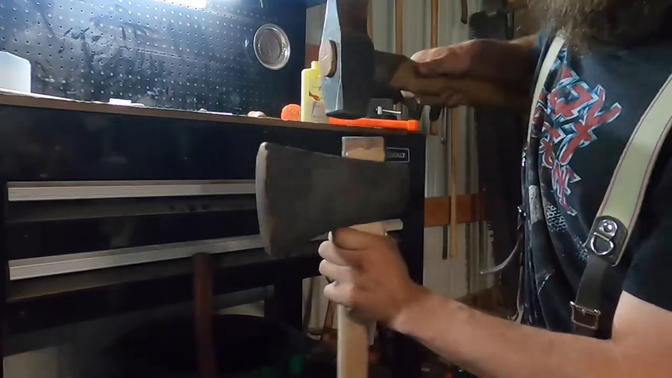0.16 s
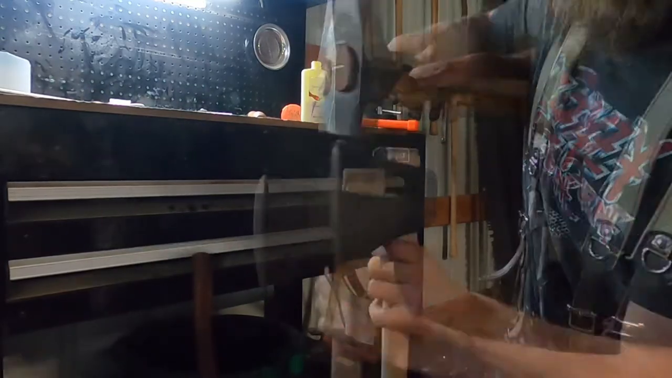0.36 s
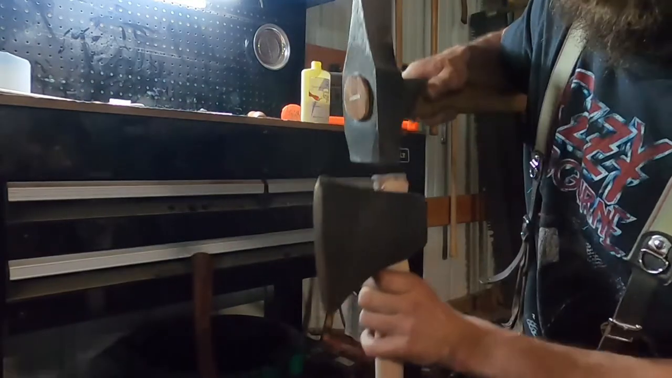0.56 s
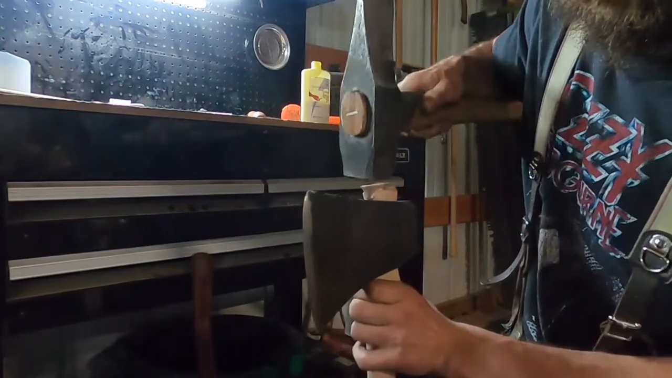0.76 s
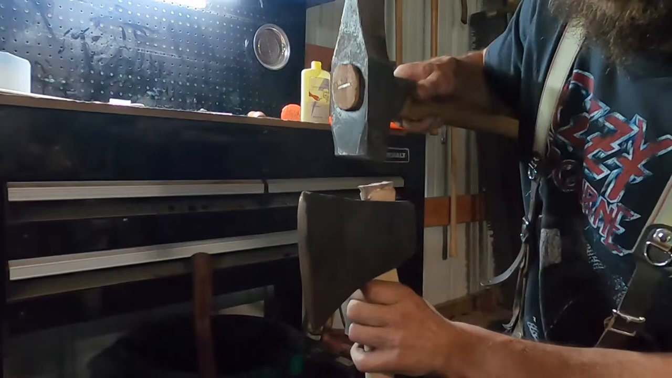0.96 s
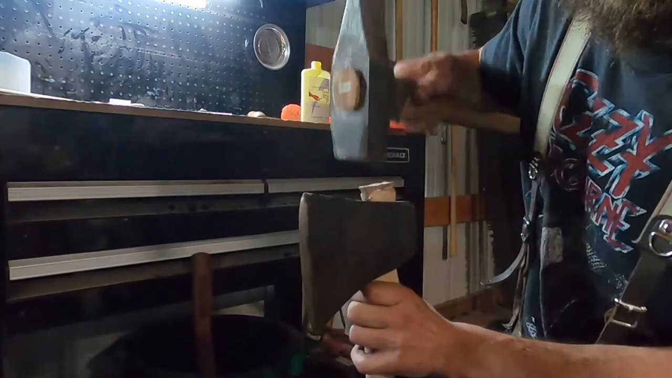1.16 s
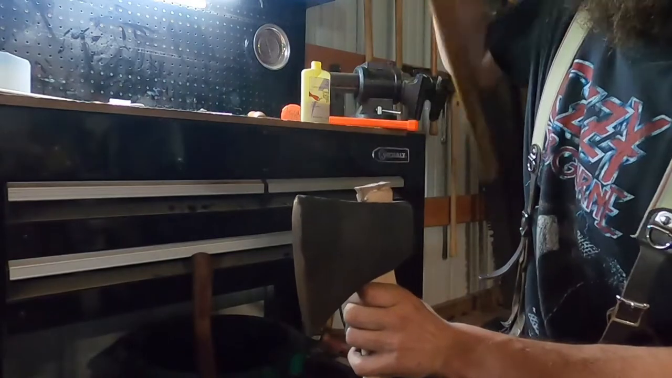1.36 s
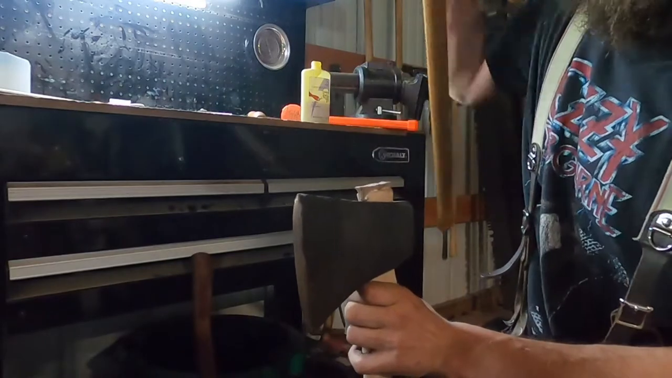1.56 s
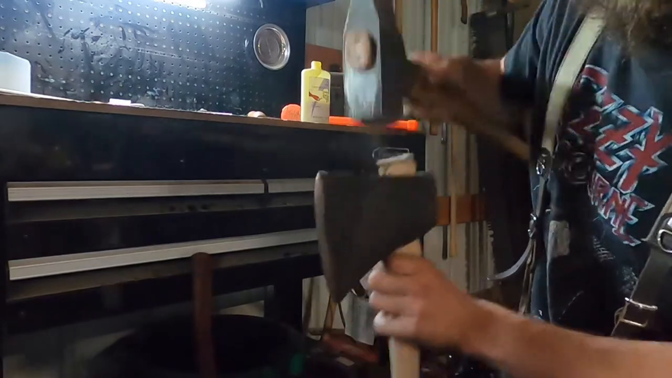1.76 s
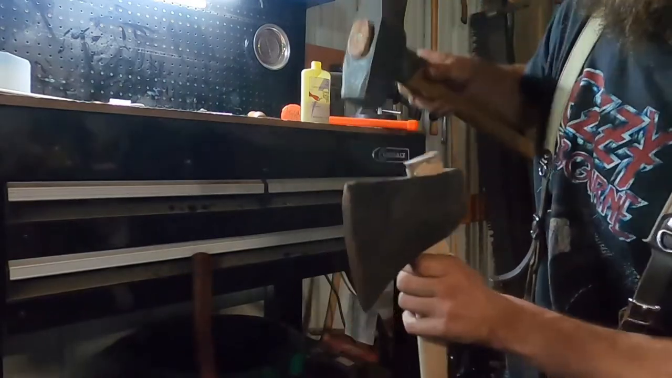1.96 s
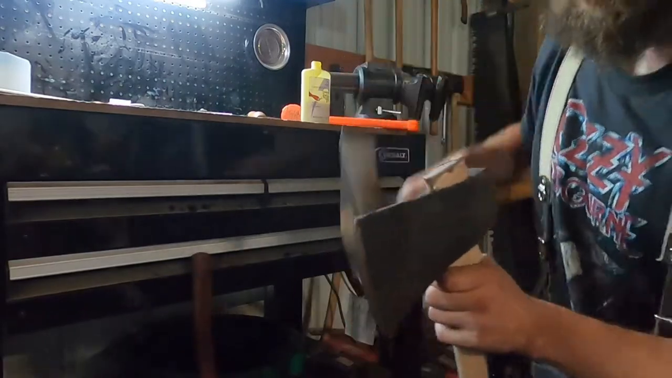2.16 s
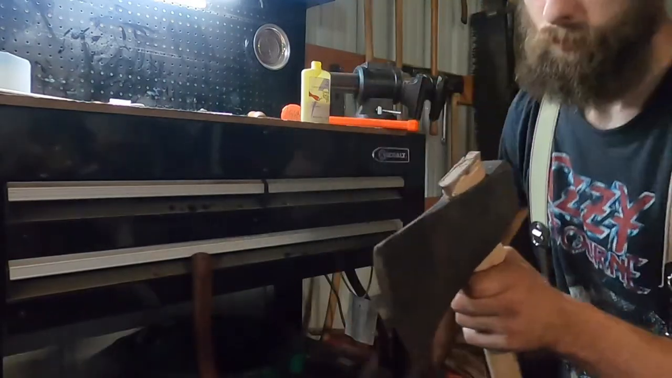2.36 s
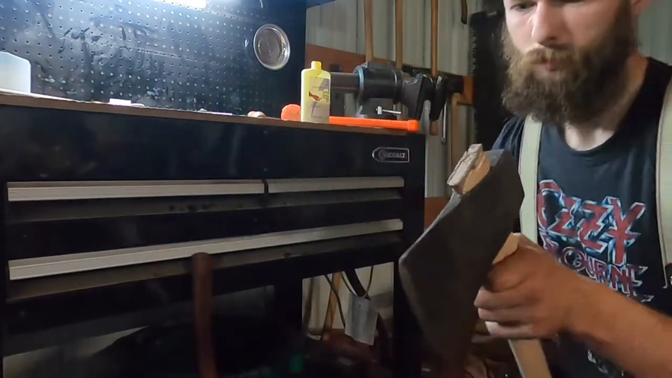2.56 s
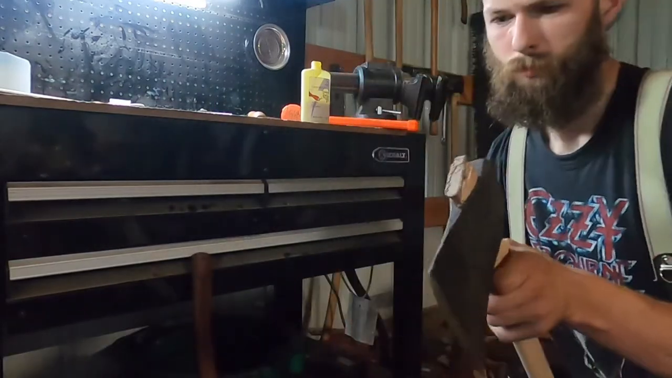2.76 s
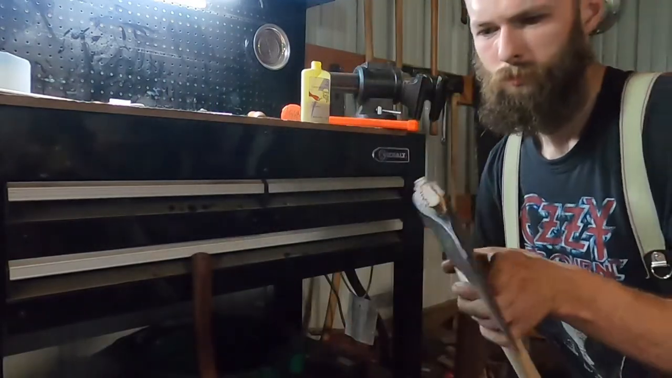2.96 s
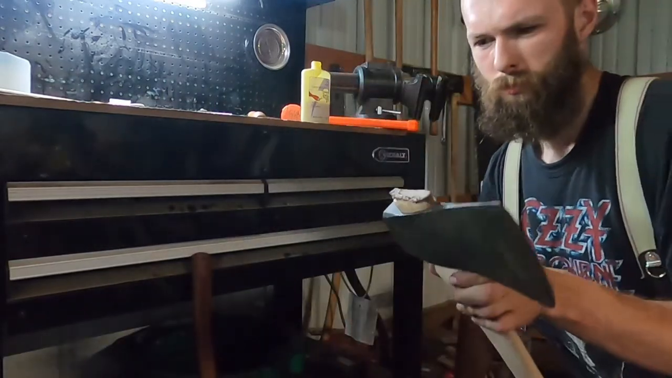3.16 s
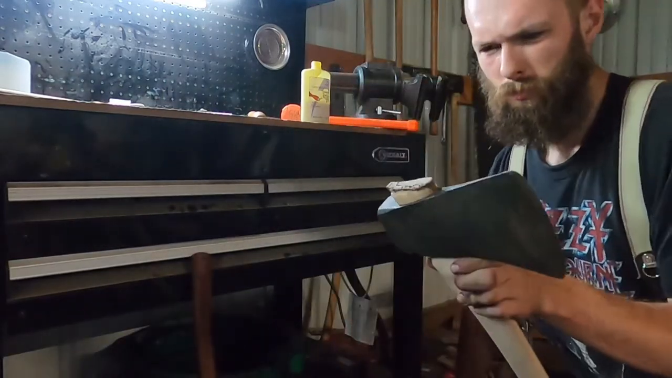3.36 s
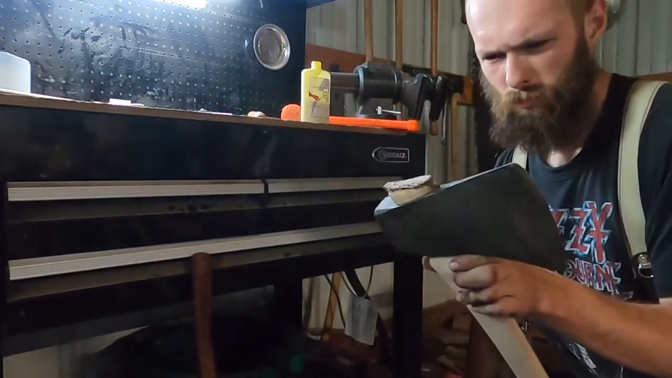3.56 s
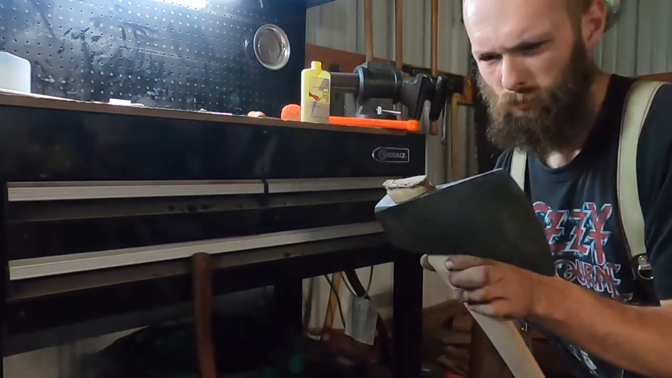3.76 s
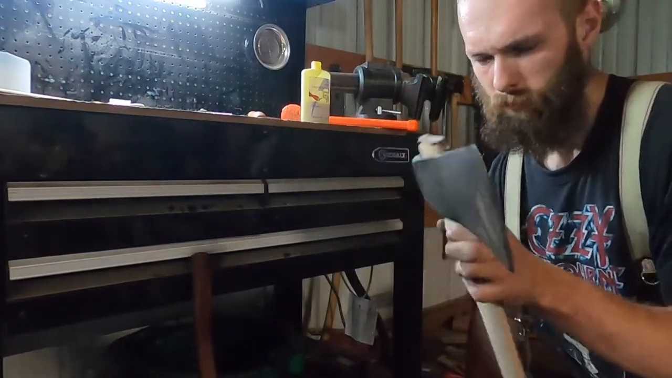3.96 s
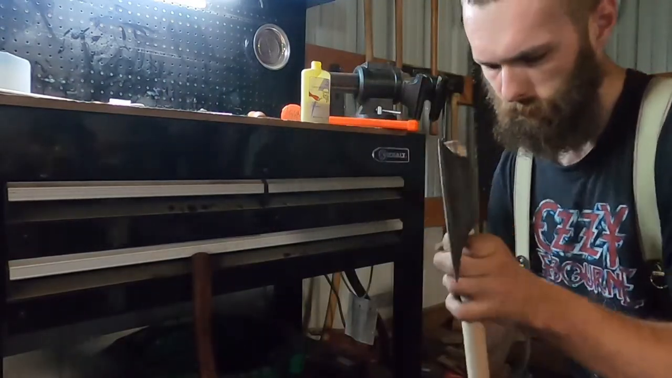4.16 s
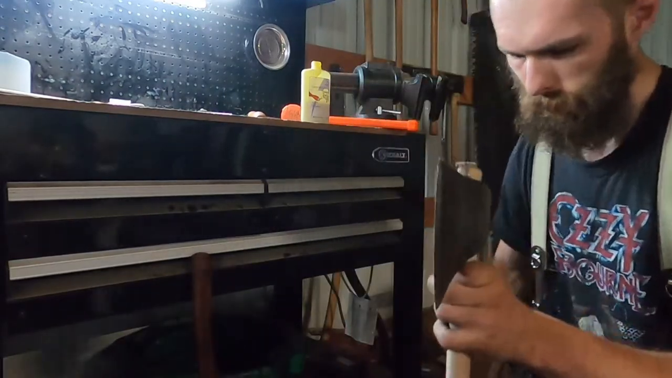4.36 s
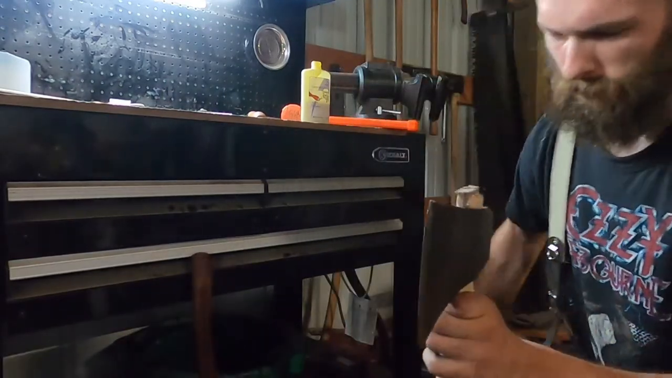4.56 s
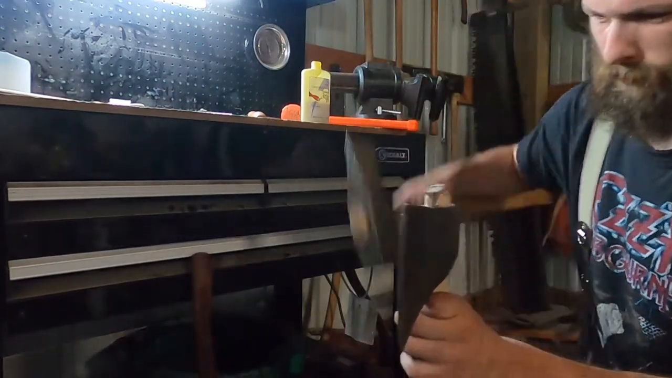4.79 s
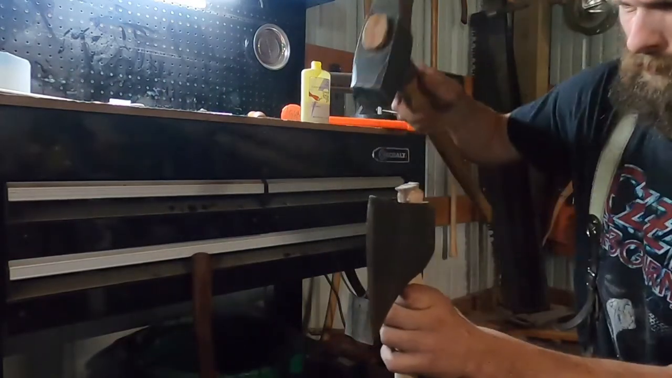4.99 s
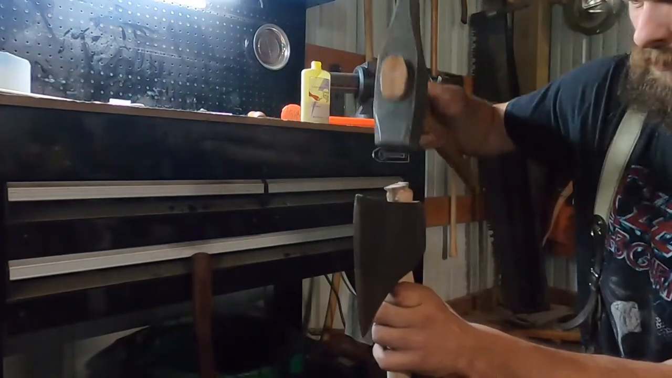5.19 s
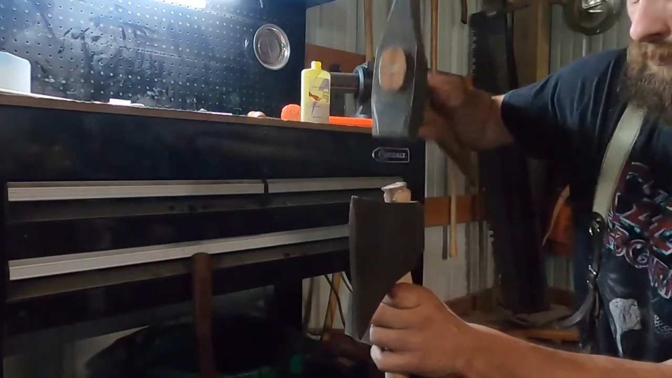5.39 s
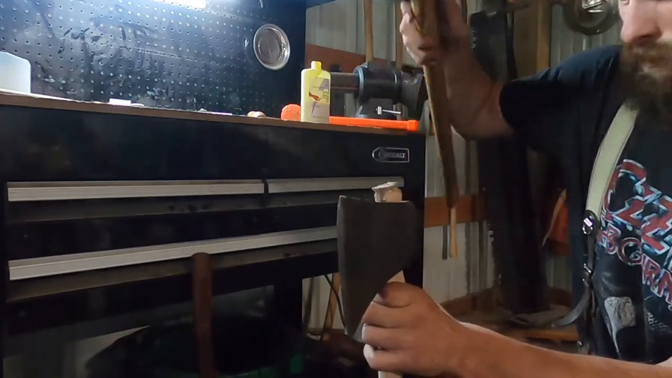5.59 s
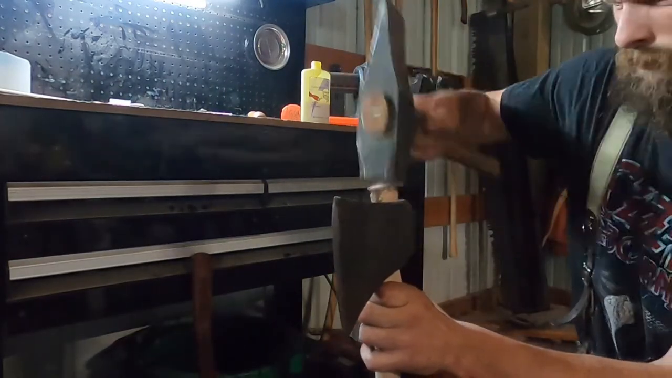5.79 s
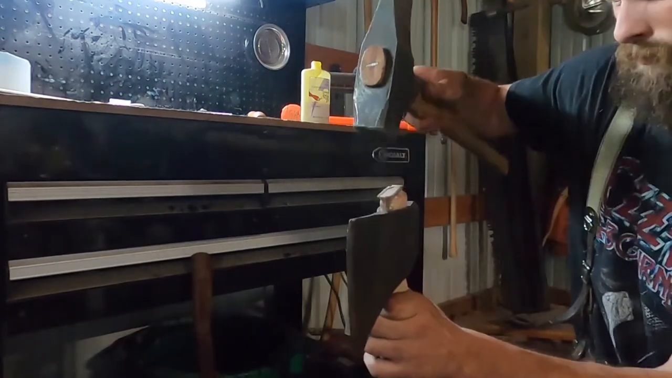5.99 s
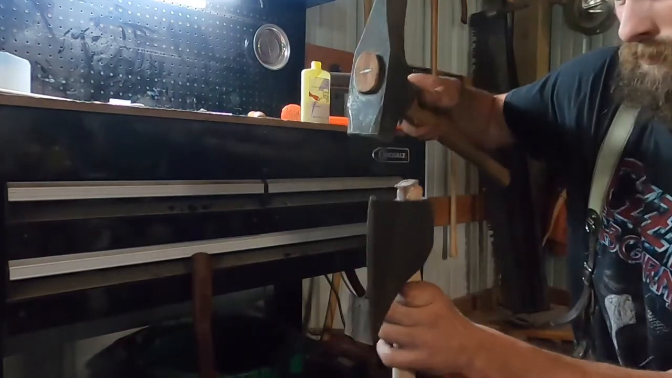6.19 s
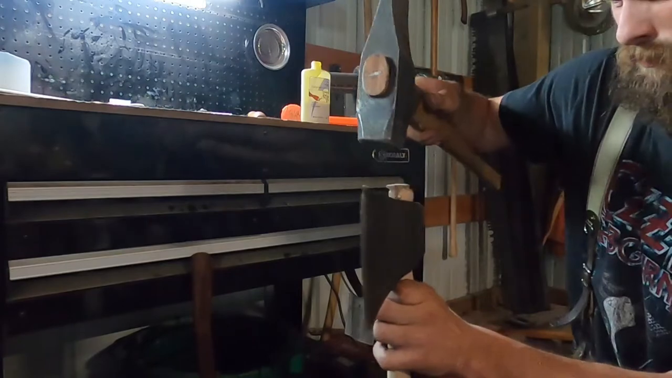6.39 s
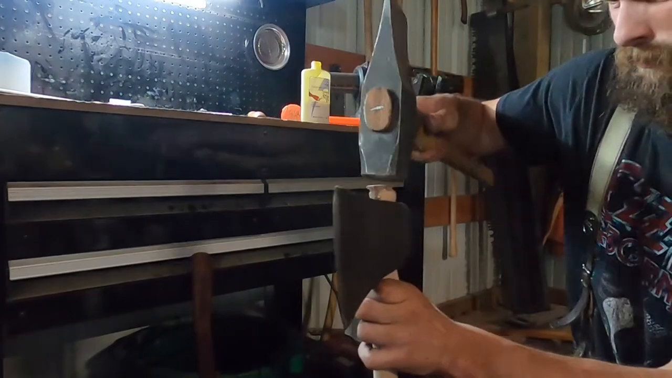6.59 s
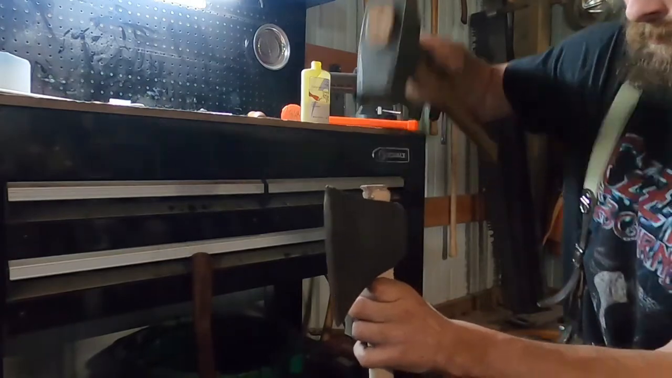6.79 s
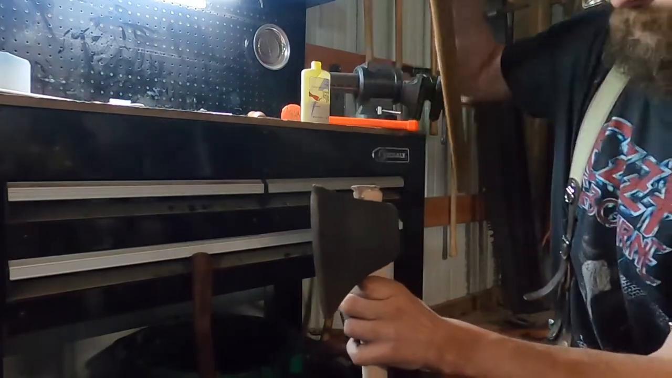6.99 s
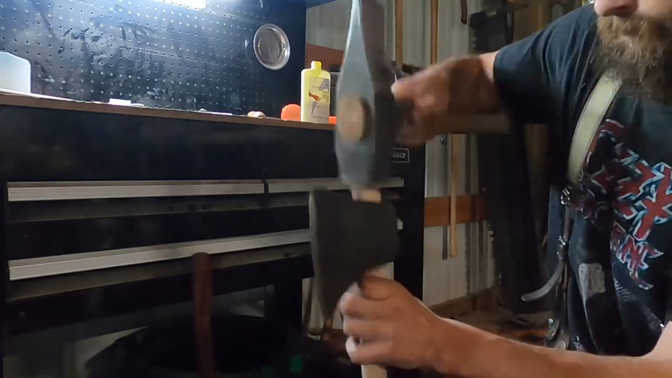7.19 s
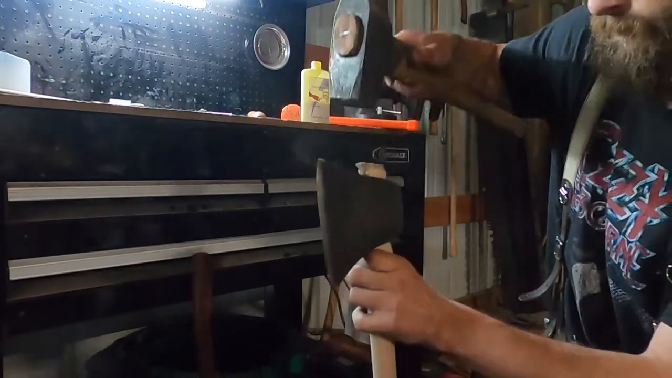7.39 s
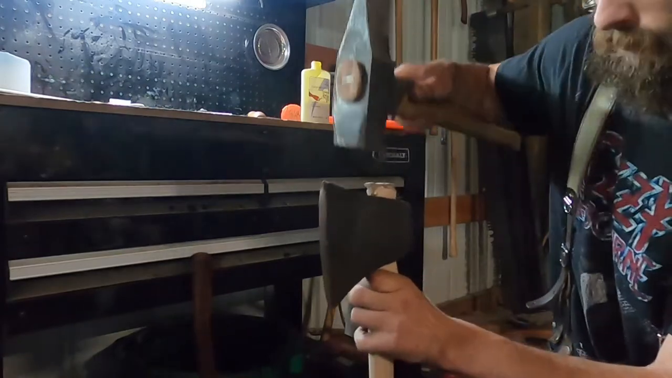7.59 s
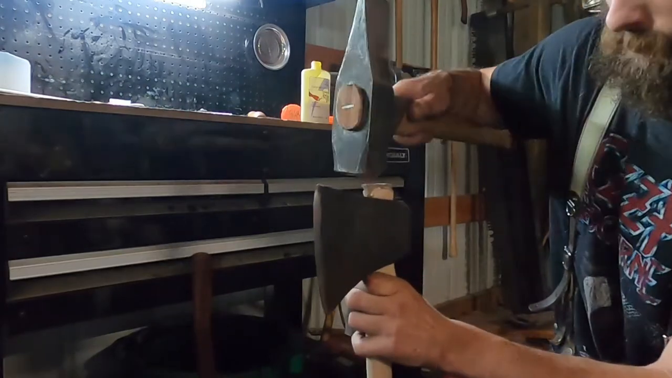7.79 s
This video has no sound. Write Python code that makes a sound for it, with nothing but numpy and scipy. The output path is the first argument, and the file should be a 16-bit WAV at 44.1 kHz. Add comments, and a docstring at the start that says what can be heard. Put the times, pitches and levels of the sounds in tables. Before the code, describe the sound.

Close up in a workshop, a hammer hits a wedge in an axe handle: one very hard blow, a quick tap, then another strike. Each knocks woodenly, the axe head ringing briefly and the room echoing for about a second. The handle bumps the floor and scuffs softly while a low machine hum slowly swells. Hammering resumes with two aiming taps and two strong, widely spaced blows, ending in light taps.

```python
"""Wedging an axe handle

A workshop, stereo microphone close to an axe that stands on the floor, a little to the right.
A hammer drives a wooden wedge into the handle: each blow cracks, rings the axe, knocks through the
handle and thuds into the floor; the room and a steel tool cabinet ring on. Between blows come bumps,
faint scuffs and hisses over a low hum. A limiter holds hard blows down, so their echo swells."""
import sys
import numpy as np
from scipy import signal
from scipy.fft import rfft, irfft
from scipy.io import wavfile
from scipy.ndimage import uniform_filter1d, minimum_filter1d

SR = 44100
rng = np.random.default_rng(int(sys.argv[2]) if len(sys.argv) > 2 else 0)


def output_pcm(signal):
    """Save a mono or channel-first signal as 16-bit PCM at the path in sys.argv[1].

    Samples are clipped to [-1, 1] before scaling.
    """
    pcm = np.clip(np.atleast_2d(signal).T, -1, 1) * 32767
    wavfile.write(sys.argv[1], SR, np.round(pcm).astype(np.int16))


N = 345744

# stereo width of the room at the microphone: (frequency [Hz], side relative to mid [dB])
SIDE_SPECTRUM = [(60, -20), (250, -17), (600, -8), (1500, -5.5), (4000, -3.5), (10000, -9)]


def from_db(db):
    """Gain of a level in dB."""
    return 10 ** (np.asarray(db) / 20)


def unit(x):
    """Scales to an rms of 1."""
    return x / np.sqrt(np.mean(x ** 2) + 1e-20)


def read(points, hz):
    """Reads a table on a log-frequency axis."""
    point_hz, values = np.transpose(points)
    return np.interp(np.log(hz + 1), np.log(point_hz + 1), values)


def add(mix, start_s, sound):
    """Mixes a sound in at its start time."""
    part = mix[..., round(start_s * SR):][..., :sound.shape[-1]]
    part += sound[..., :part.shape[-1]]


def colour(x, points):
    """Filters by a spectrum of (frequency [Hz], gain [dB]) points."""
    size = x.shape[-1]
    return irfft(rfft(x) * from_db(read(points, np.fft.rfftfreq(size, 1 / SR))), size)


def causal(gain_db):
    """The promptest impulse response with this spectral shape, at energy 1."""
    log_gain = np.log(from_db(np.r_[gain_db, gain_db[-2:0:-1]]))
    response = np.fft.ifft(np.exp(np.conj(signal.hilbert(log_gain)))).real
    return response / np.linalg.norm(response)


def ring(modes, t):
    """Dying sines of a struck object."""
    return sum(from_db(db - 60 * t / t60) * np.sin(2 * np.pi * hz * t) for hz, db, t60 in modes)


def drift(rate_hz):
    """Slow random wander with an rms of 1."""
    hz = np.fft.rfftfreq(N, 1 / SR)
    return unit(irfft(rfft(rng.standard_normal(N)) * np.exp(-(hz / rate_hz) ** 2), N))


def room_air(level_db=-45, swell_db=2.0):
    """Room tone around the microphone: a wavering rumble with a faint hiss near 5500 Hz."""
    # spectrum of the air: (frequency [Hz], relative density [dB])
    spectrum = [(12, -35), (25, -19), (42, -7), (70, 0), (100, -5), (125, -15), (205, -15), (270, -31),
                (600, -42), (1100, -36.5), (1800, -47), (4000, -55.5), (4900, -55), (5500, -47),
                (6100, -63), (13000, -85)]
    noise = unit(colour(rng.standard_normal((2, N)), spectrum))
    mid, side = from_db(level_db + swell_db * drift(4.0)) * noise
    side = colour(side, SIDE_SPECTRUM)
    return np.array([mid + side, mid - side])


def machine_hum(peak_s=5.2, peak_db=-37, rest_db=-56, rise_db_per_s=6.5, fall_db_per_s=8.5):
    """A machine's low hum, centred: it wanders in pitch, grows steadily, then sinks back."""
    # lines of the hum: (frequency [Hz], relative level [dB])
    lines = [(75.4, 13), (91, -17), (181.5, -22.5), (196, -15)]
    t, hum = np.arange(N) / SR, np.zeros(N)
    for hz, db in lines:
        wandering_hz = hz + 0.556 * drift(5.0)
        hum += from_db(db) * np.sin(2 * np.pi * np.cumsum(wandering_hz) / SR)
    rising_db = peak_db - rise_db_per_s * (peak_s - t)
    falling_db = np.maximum(peak_db - fall_db_per_s * (t - peak_s), rest_db)
    return from_db(np.where(t < peak_s, rising_db, falling_db)) * unit(hum)


def wood_slip(tilt_db_per_octave):
    """One slip of the wedge; a sharper contact is brighter."""
    # the dry crack of steel on wood: (frequency [Hz], relative level [dB])
    spectrum = [(40, -18.5), (200, 0.5), (450, 0.5), (950, 3.5), (1400, -2.5), (2000, -4), (2900, -7.5),
                (3900, -16), (5200, -21), (7000, -32), (9000, -34), (11000, -54.5), (15000, -59)]
    hz = np.fft.rfftfreq(2048, 1 / SR)
    return causal(read(spectrum, hz) + tilt_db_per_octave * np.log2(np.maximum(hz, 700) / 1500))


def crushing(t, touch=0.24, crush_s=0.0062, fade_s=0.0016, chatter=0.16, chatter_s=0.034):
    """Strength of the slips: it grows as the wedge is driven, then drops to a chatter of the head."""
    rise = np.interp(t, [0, crush_s], [touch, 1])
    after = np.maximum(t - crush_s, 0)
    return rise * (np.exp(-after / fade_s) + chatter * np.exp(-after / chatter_s))


def axe_ring(t, centre_hz, reach_octaves):
    """Where and how the axe is hit decides which partials sound."""
    # the axe's modes up to about 7 kHz, then a brief high sizzle at 11-12 kHz:
    # (frequency [Hz], relative level [dB], t60 [s])
    partials = [(691, -12.5, 0.28), (777, -5.5, 0.06), (910, -12.5, 0.15), (966, -10.5, 0.19),
                (1140, -2, 0.035), (1170, -0.5, 0.035), (1295, -11.5, 0.05), (1743, -9, 0.12),
                (1955, -5, 0.11), (2053, -6.5, 0.085), (2270, -14, 0.036), (2530, -3.5, 0.08),
                (2600, -5, 0.088), (2845, -4.5, .1), (3340, -7, 0.14), (5000, -5, .06), (5070, -8, .05),
                (5333, -5, 0.057), (6640, -8.5, 0.06), (6770, -7, 0.06), (6890, -9.5, 0.036),
                (7030, -6, 0.047), (11050, -12, 0.012), (11700, -11, .012), (12200, -11, 0.012)]
    woken = [(hz, db - min(9 * (np.log2(hz / centre_hz) / reach_octaves) ** 2, 70), t60)
             for hz, db, t60 in partials]
    return ring(woken, t) * (1 - np.exp(-t * centre_hz))  # they build up over about one swing


def handle_knock(t, hz, peak_s=0.00434, rebound_s=0.003, rebound_width_s=0.00042):
    """The handle is squeezed, springs back and rebounds; a harder knock is higher and swings more."""
    cycles = (t - peak_s) * hz
    swings = (hz / 400) ** 0.37
    width_cycles = swings * np.where(cycles < 0, 0.74, 0.29)  # slow rise, quick fall
    squeeze = -np.cos(2 * np.pi * cycles) * np.exp(-(cycles / width_cycles) ** 2)
    rebound = 0.08 / swings * np.exp(-((t - peak_s - rebound_s) / rebound_width_s) ** 2)
    return squeeze + rebound


def floor_thud(t, delay_s=0.008, floor_hz=84, decay_s=0.0053, radiate_hz=56):
    """The butt of the handle pushes the floor, which answers late and low."""
    late = np.maximum(t - delay_s, 0)
    swing = np.sin(2 * np.pi * floor_hz * late) * np.exp(-late / decay_s)
    radiation = signal.butter(2, radiate_hz, "high", fs=SR)  # slow motion moves little air
    return signal.lfilter(*radiation, swing)


def contact(knock_hz, crack_db, tilt, thud_db, ring_db, ring_hz, reach, room_db):
    """One hit on the axe, as four rows: the direct sound, then three paths into the room."""
    t = np.arange(SR // 3) / SR
    strength = crushing(t)
    slip = from_db(crack_db) * wood_slip(tilt)
    crack = signal.fftconvolve(rng.choice([-1., 1.], len(t)) * strength, slip)[:len(t)]
    axe = handle_knock(t, knock_hz) + from_db(ring_db) * axe_ring(t, ring_hz, reach)
    floor = from_db(thud_db) * floor_thud(t)
    # the slips radiate every way: half their energy blends evenly, half keeps the crack's own colour
    blended = np.linalg.norm(strength) * np.pad(slip, (0, len(t) - len(slip)))
    sends = np.array([np.sqrt(0.5) * blended,
                      from_db(-2.5) * axe,
                      from_db(9.0) * floor + np.sqrt(0.5) * crack])
    return np.vstack([crack + axe + floor, from_db(room_db) * sends])


def hammer_blows(full_swing_hz=880, full_crack_db=-3, crack_db_per_octave=16):
    """A light tap on the wedge mostly knocks; a hard swing knocks higher and crushes the wood."""
    # aiming taps and full swings; ring and thud are relative to the force:
    # (time [s], force [dB], knock [Hz], ring [dB], ring centre [Hz], ring reach [octaves],
    #  treble tilt of the crack [dB/octave], floor thud [dB], room send [dB])
    blows = [ (0.0754, 19, 875, -26.5, 5000, 0.41, -3, 0, -8),
             (0.3064, -12, 1530, -16, 4760, 0.33, -2.5, 13, -11),
             (1.7705, 0, 778, -0.5, 860, .33, -0.5, -2.5, -2.5),
             (4.593, -10, 409, -12.5, 1437, 0.5, 0.5, -21.5, -1.5),
             (5.3654, -9.5, 361, -14.5, 675, 0.32, -2, -15, -2.5),
             (5.8875, 1.5, 572, -26, 8650, 0.53, -2.5, -5.5, -2.5),
             (7.2947, 0, 893, -9.5, 1280, 0.68, -4, -2.5, -5),
             (7.6177, -20, 335, -40, 1520, .4, -1, -17, -5),
             (7.7988, -12, 412, -24.5, 1497, 0.36, -5.5, -19, -9.5)]
    paths = np.zeros((4, N))
    for start_s, force_db, knock_hz, ring_db, ring_hz, reach, tilt, thud_db, room_db in blows:
        crack_db = full_crack_db + crack_db_per_octave * np.log2(knock_hz / full_swing_hz)
        blow = contact(knock_hz, crack_db, tilt, thud_db, ring_db, ring_hz, reach, room_db)
        add(paths, start_s, from_db(force_db) * blow)
    return paths


def workshop_echo(send, first_s=0.0039, build_s=0.0054):
    """A dense echo builds as the walls answer, over standing waves and the ringing steel cabinet."""
    # colour of the echo: (frequency [Hz], relative level [dB])
    spectrum = [(30, -5), (60, 6.5), (110, 12), (175, 11.5), (260, 6), (380, -1.77), (600, 1), (900, 1.5),
                (1500, 0.5), (3000, -0.5), (6000, -1), (14000, 4)]
    # decay of the echo: (frequency [Hz], t60 [s])
    decay = [(60, 0.0159), (160, 0.3821), (400, 1), (1000, 0.82), (2500, 1.0), (5000, 1.0), (8000, 0.89),
             (12000, 0.48), (14000, 0.21)]
    # standing waves of the room: (frequency [Hz], level [dB], t60 [s])
    standing_waves = [(53.9, -61, 0.93), (87.54, -56, 0.48), (125.7, -59.5, .7), (151, -55, 0.85),
                      (182.8, -53, 0.57)]
    # the tool cabinet, ringing in sympathy: (frequency [Hz], level [dB], t60 [s])
    cabinet_modes = [(684, -62, 0.97), (786, -59, 0.35), (910, -61.5, 0.73), (1563, -63.5, 0.56),
                     (1705, -62, 1), (1961, -67.5, 0.7), (2870, -65.5, 0.8)]
    t = np.arange(SR * 3 // 2) / SR
    mid, side = colour(rng.choice([-1., 1.], (2, len(t))), spectrum)
    hz, times, bands = signal.stft(np.array([mid, colour(side, SIDE_SPECTRUM)]), SR, nperseg=512)
    bands *= from_db(-60 * times / read(decay, hz)[:, None])
    tails = signal.istft(bands, SR, nperseg=512)[1][:, :len(t)]
    tails *= np.clip((t - first_s) / build_s, 0, 1)
    tails /= np.linalg.norm(tails[0])
    tails[0] += ring(standing_waves + cabinet_modes, t)
    mid, side = signal.fftconvolve(send[None], tails, axes=1)[:, :N]
    return np.array([mid + side, mid - side])


def floor_bumps(thud_db=-5.5, tilt=1):
    """The butt meets the floor as the axe is shifted: a thin click, a low knock, a ring and a thud."""
    # bumps; click and ring are relative to the force: (time [s], force [dB], knock [Hz], click [dB],
    #  ring [dB], ring centre [Hz], ring reach [octaves], room send [dB])
    bumps = [ (0.694, -26, 270, -30.5, -43, 1460, .4, -4.5), (1.1373, -19, 345, -14, -13, 900, 1.7, -6.5),
             (3.207, -24, 352, -27, -11.5, 835, 0.4, -1.5), (3.2260, -24.5, 327, -19, -2.5, 854, 0.16, 0),
             (6.650, -21.5, 302, -20, -16, 1260, 0.78, -5), (7.706, -39, 398, -10, -1, 990, .4, -7)]
    paths = np.zeros((4, N))
    for start_s, force_db, knock_hz, click_db, ring_db, ring_hz, reach, room_db in bumps:
        bump = contact(knock_hz, click_db, tilt, thud_db, ring_db, ring_hz, reach, room_db)
        add(paths, start_s, from_db(force_db) * bump)
    return paths


def grainy_noise(size, centre_hz, width_octaves, grain_db):
    """Uneven grains of noise in one wide band."""
    hz = np.fft.rfftfreq(size, 1 / SR)
    grains = rng.standard_normal(size) * from_db(grain_db * rng.standard_normal(size))
    band = np.exp(-(np.log2((hz + 1) / centre_hz) / width_octaves) ** 2)
    return unit(irfft(rfft(grains) * band, size))


def faint_hisses(flutter_db=0.5):
    """Soft, fluttering swells of hiss around 3.5-5 kHz, each loudest in its middle."""
    # swells of hiss: (start [s], length [s], level [dB], centre [Hz])
    swells = [(1.239, 0.22, -63, 3700), (2.04, 0.18, -60.5, 4970), (3.36, 0.34, -68, 4300),
              (4.753, 0.28, -64, 3580), (6.803, .3, -67, 3700)]
    t, out = np.arange(SR // 2) / SR, np.zeros(N)
    for start_s, length_s, db, centre_hz in swells:
        arch = np.sin(np.pi * np.minimum(t / length_s, 1))
        hiss = grainy_noise(len(t), centre_hz, width_octaves=0.64, grain_db=3.5)
        add(out, start_s, from_db(db) * arch * hiss)
    return out * from_db(flutter_db * drift(30.0))


def scuffs_and_puffs(flicker_db=3.0):
    """Ticks, scuffs and faint puffs of hiss that start sharply and fade; their level flickers."""
    # short bursts of grainy noise: (start [s], level [dB], rise [s], centre [Hz])
    bursts = [(1.43, -57.5, 0.008, 3370), (2.4168, -37.5, 0.0027, 1960), (2.516, -58.5, 0.047, 3120),
              (2.824, -64, .004, 1480), (2.924, -64, 0.004, 3425), (3.012, -61, 0.013, 3330),
              (3.053, -59, 0.04, 2900), (3.485, -62, .005, 1530), (4.047, -61.5, 0.0069, 3740),
              (4.044, -60.5, 0.055, 2290), (4.323, -66, 0.0043, 1690), (6.4, -55, 0.016, 3460),
              (6.48, -54, 0.005, 4100), (6.659, -47.5, 0.0054, 2800)]
    t, out = np.arange(SR // 3) / SR, np.zeros(N)
    for start_s, db, rise_s, centre_hz in bursts + turning_scuffs():
        swell = (t / rise_s * np.exp(1 - t / rise_s)) ** 2
        grains = grainy_noise(len(t), centre_hz, width_octaves=0.9, grain_db=5.0)
        add(out, start_s, from_db(db) * swell * grains)
    return out * from_db(flicker_db * drift(140.0))


def turning_scuffs(count=5, from_s=2.66, to_s=2.84, db=-63, spread_db=2.0, rise_s=0.022, hz=2560):
    """Rows of faint scuffs, loosely spaced while the axe is turned in the hand."""
    lateness, loudness = rng.random((count, 2)).T
    times = from_s + (to_s - from_s) * (np.arange(count) + lateness) / count
    levels = db + spread_db * (2 * loudness - 1)
    return [(start_s, level, rise_s, hz) for start_s, level in zip(times, levels)]


def scene(wall_s=0.0233, left_db=3.0, right_db=4.0, echo_lean_db=0.5):
    """The axe close to the microphone, a slap from the nearest wall, and the workshop behind."""
    direct, slip_send, axe_send, floor_send = hammer_blows() + floor_bumps()
    small_sounds = scuffs_and_puffs() + faint_hisses()
    near = direct + small_sounds
    wall_slap = from_db(-16.5) * colour(direct, [(100, -6.5), (600, 6.0), (4000, -16.5)])
    add(near, wall_s, wall_slap)
    # the axe stands a little to the right: the left side hears it a sample later and duller
    left = colour(np.r_[0, near[:-1]], [(200, 1.9), (800, -4.5), (4000, -3.5)])
    close = np.array([from_db(left_db) * left, from_db(right_db) * near])
    sends = slip_send + from_db(-2.5) * small_sounds, axe_send, floor_send
    echo = sum(workshop_echo(send) for send in sends)
    echo[0] = np.r_[0, echo[0, :-1]]
    echo *= from_db([[echo_lean_db], [-echo_lean_db]])
    return close + echo + room_air() + machine_hum()


def record(dry, hold_s=0.047, recover_db_per_s=80, edge_hz=14500):
    """A look-ahead limiter ducks, holds and recovers faster than the echo dies; then a band limit."""
    over_db = np.maximum(20 * np.log10(abs(dry).max(0) + 1e-9), 0)
    recovery_db = np.arange(N) / SR * recover_db_per_s
    duck_db = recovery_db - np.maximum.accumulate(over_db + recovery_db)
    half_hold = round(hold_s * SR / 2)
    duck_db = minimum_filter1d(duck_db, size=2 * half_hold + 1, origin=half_hold)
    duck_db = uniform_filter1d(minimum_filter1d(duck_db, size=257), size=257)  # eases in ahead
    ducked = dry * from_db(duck_db)
    rounded = ducked / (1 + ducked ** 8) ** 0.125  # the peaks round off
    lowpass = signal.firwin(255, edge_hz, window=("kaiser", 9), fs=SR)
    return signal.oaconvolve(rounded, lowpass[None], "same")


dry = scene()
out = record(dry)
output_pcm(out)
```